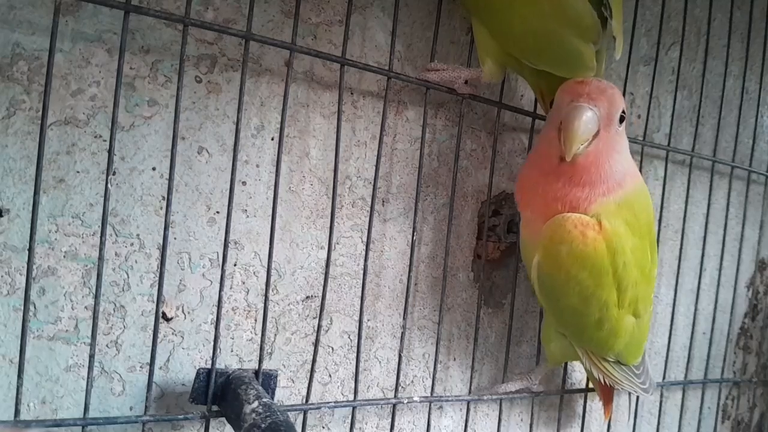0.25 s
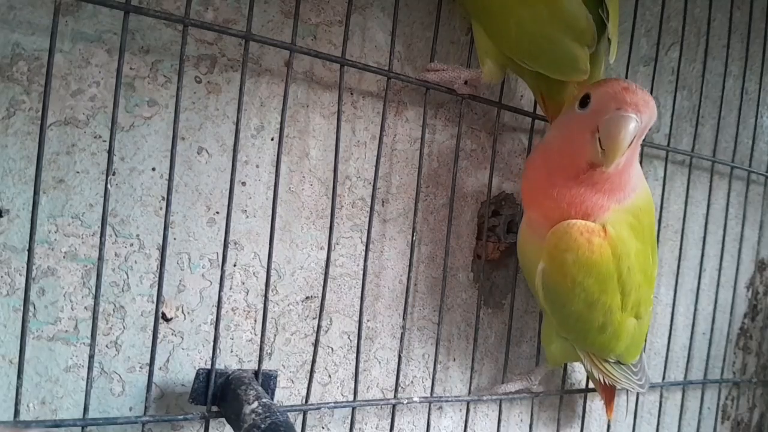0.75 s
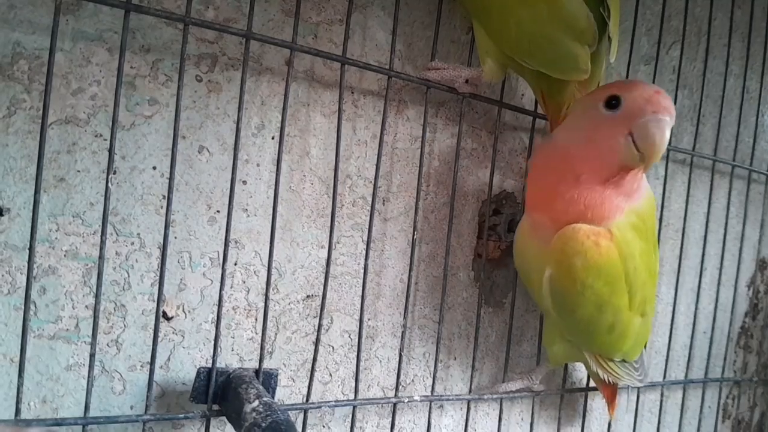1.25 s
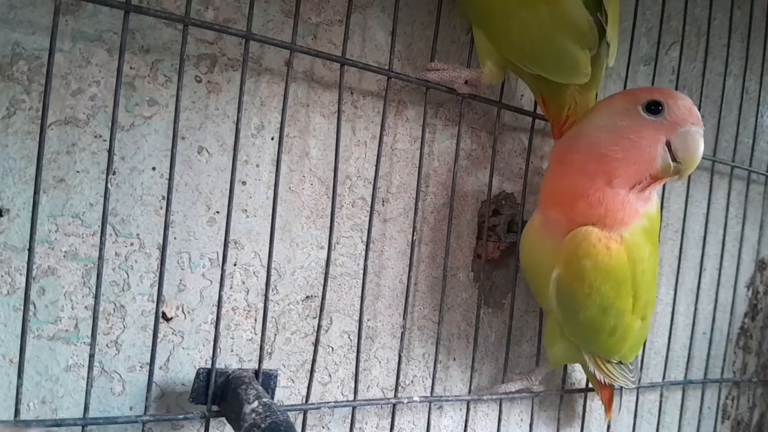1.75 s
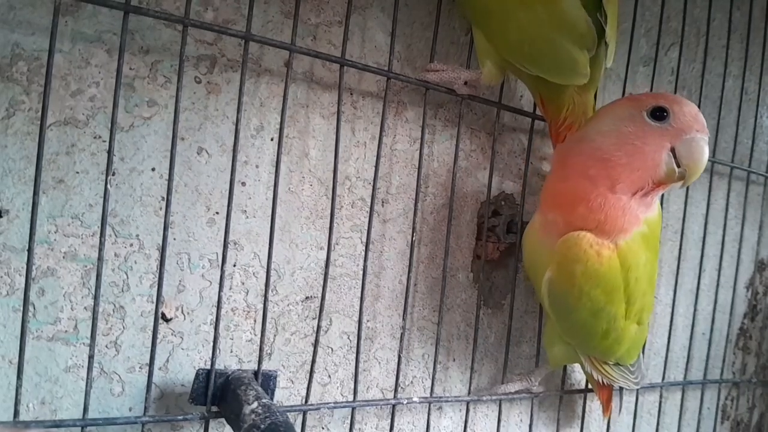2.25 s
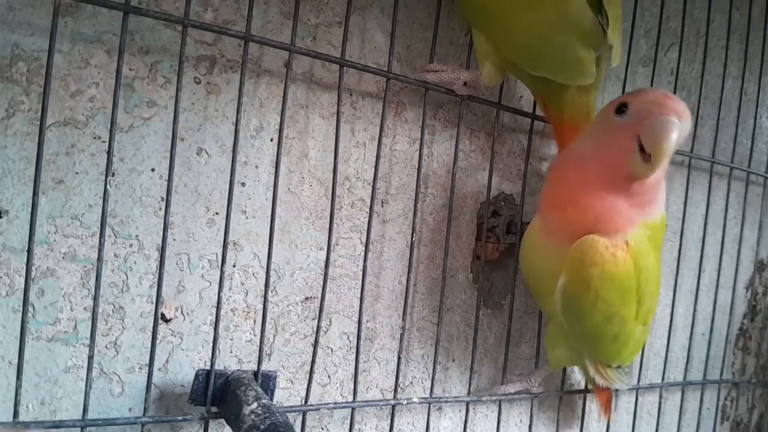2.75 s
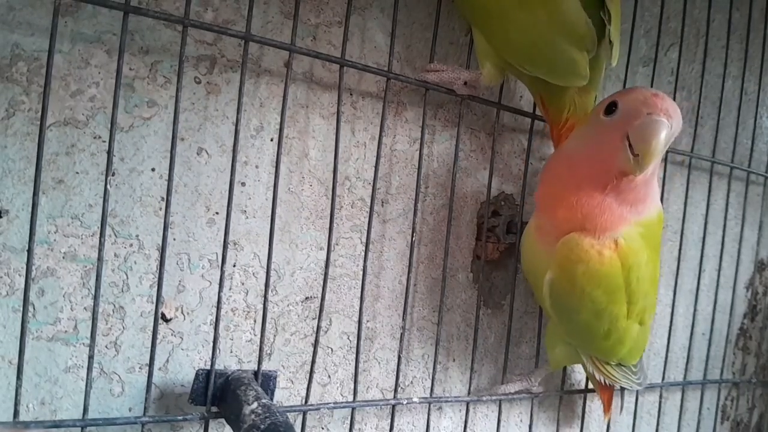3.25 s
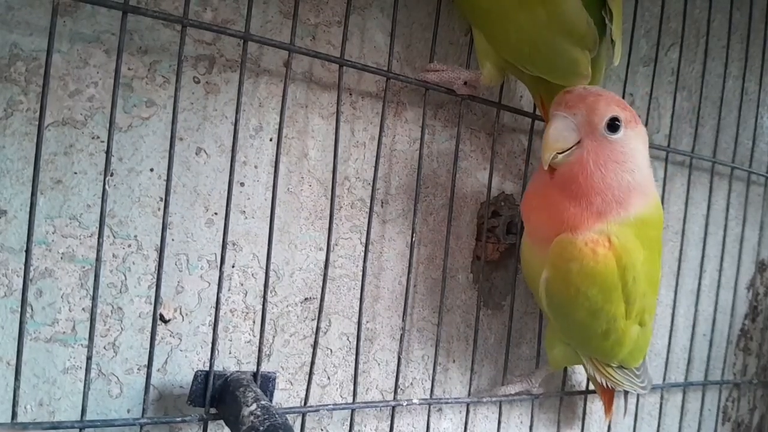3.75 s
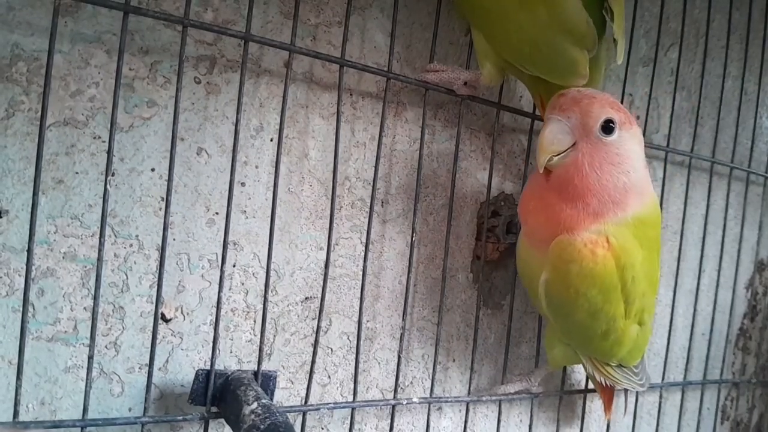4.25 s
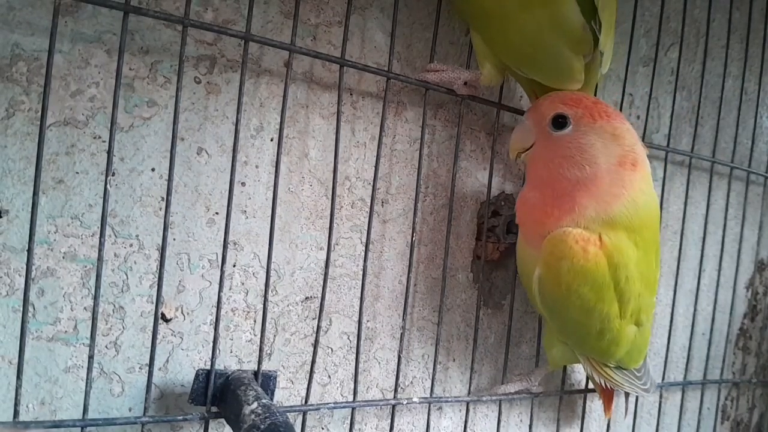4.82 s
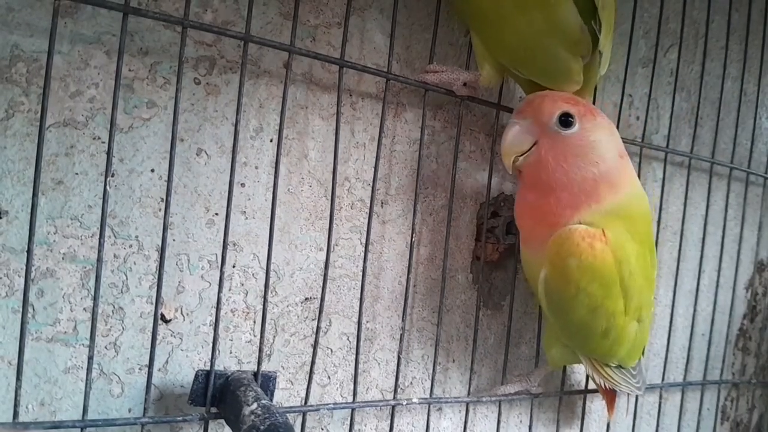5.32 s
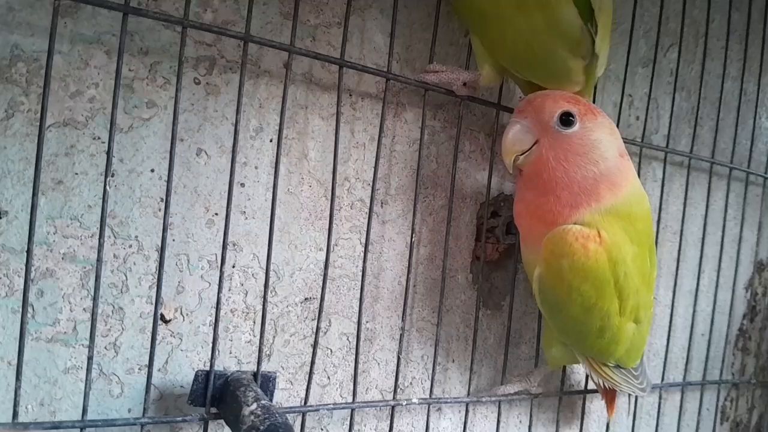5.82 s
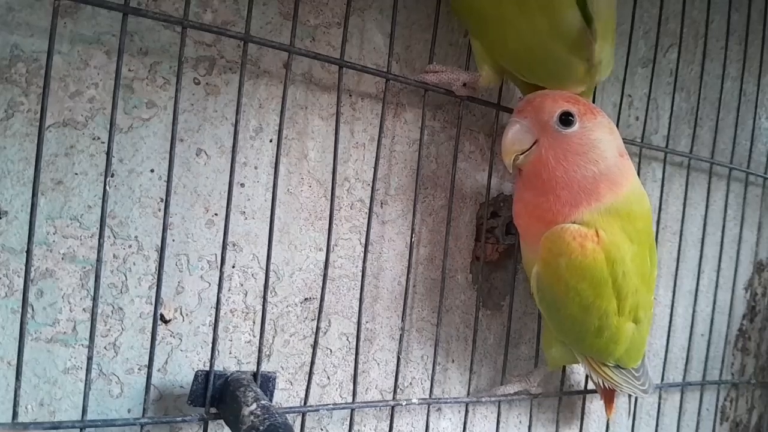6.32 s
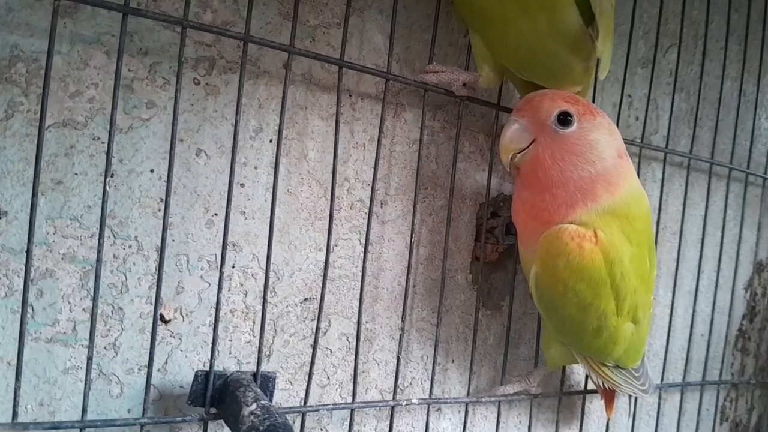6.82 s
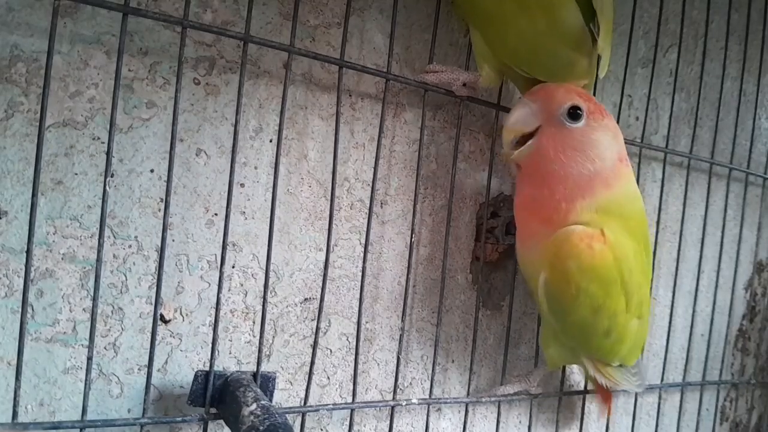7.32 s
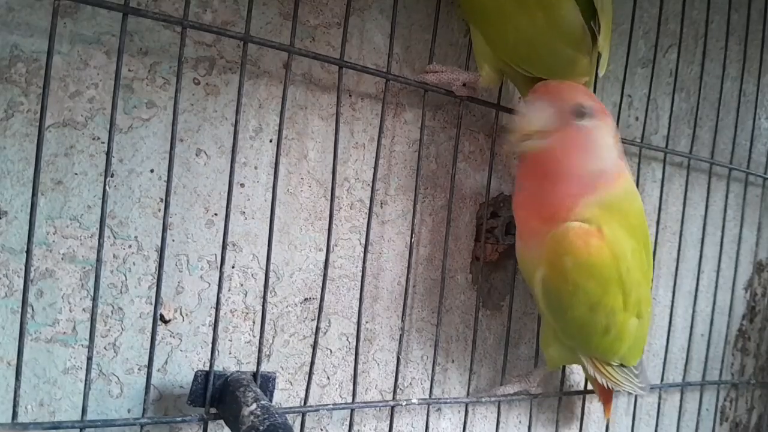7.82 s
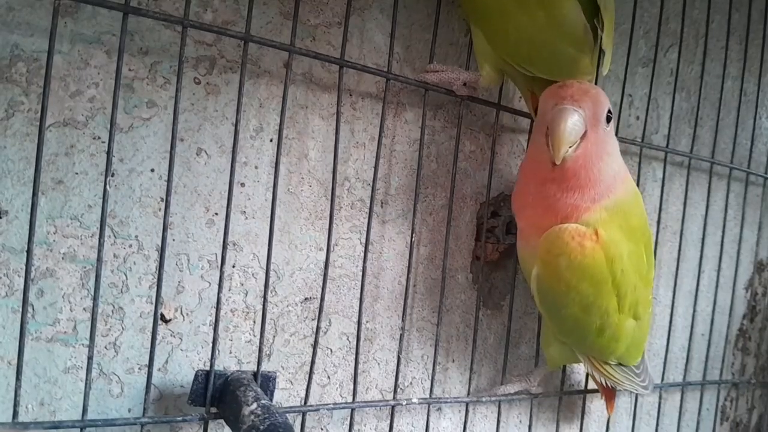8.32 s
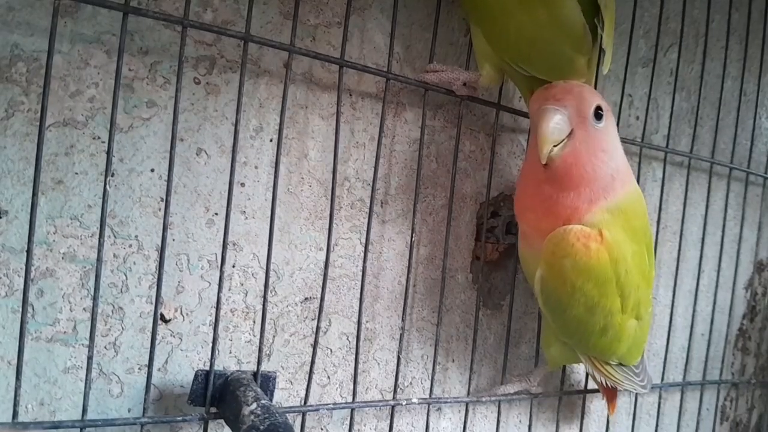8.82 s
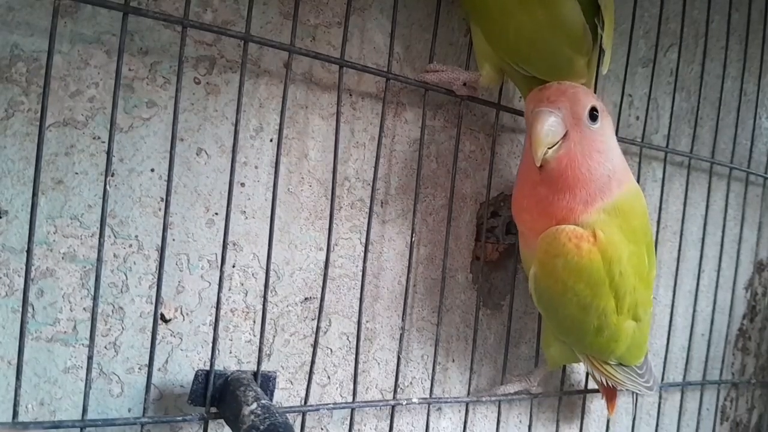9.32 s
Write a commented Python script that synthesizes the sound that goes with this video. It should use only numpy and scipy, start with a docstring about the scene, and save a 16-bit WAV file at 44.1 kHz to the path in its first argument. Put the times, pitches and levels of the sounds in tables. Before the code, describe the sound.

Piercing parrot squawks break into tiny whistles over a faint hum, followed by a pause and a fast, bright burst of chirping.

```python
"""Lovebirds in a wire cage close to the microphone, over a low wavering hum, rumble and soft hiss.
Single screeches come first: a harsh cry, mostly breaking with a crack and a puff into a shrill whistle.
Among them one far, drawn-out crow starts hoarse and sinks; the wall and the room answer faintly.
Then a fast run of chatter drifts from thin chips over falling and rasping notes to short screeches.
Voices are trembling stacks of harmonics with rasp; air, hiss and rumble are coloured noise."""
import sys
import numpy as np
from scipy import signal
from scipy.fft import rfft, irfft, next_fast_len
from scipy.io import wavfile
from scipy.ndimage import uniform_filter1d, minimum_filter1d

SR = 44100
rng = np.random.default_rng(int(sys.argv[2]) if len(sys.argv) > 2 else 0)


def file_out(sig):
    """Save sig as 16-bit WAV at sys.argv[1]."""
    # one column per channel
    cols = np.atleast_2d(sig).T
    # limit, then scale
    lim = np.clip(cols, -1, 1)
    pcm = np.round(lim * 32767).astype(np.int16)
    wavfile.write(sys.argv[1], SR, pcm)


N = 422037

# Colour of the harsh rasp in the voice. Each row: frequency in Hz, relative level in dB.
RASP_COLOUR = [(200, -3.5), (1200, -22.5), (2200, -5), (3200, 2), (5000, -2), (7000, 7), (9000, -5),
               (11000, -15), (13000, 2.5), (15000, -13.5), (16500, -17.5)]
# Colour of the breath and puffs. Each row: frequency in Hz, relative level in dB.
BREATH_COLOUR = [(20, -24), (60, 3), (160, 10.5), (400, -2.5), (700, -10), (1250, -6.5), (2000, -22.5),
                 (3200, -14), (5000, -29.5)]

SCOOP_S, SCOOP_DB = .021, 43.5  # a cry climbs to its pitch; dB quieter per share of pitch still to climb
YELP_AT_S, YELP_S = .0085, .0035  # brief upward flick near the start of a cry: time and width
WARBLE_HZ, WARBLE_DB = 117.8, 168.5  # fast wobble of a cry: rate; dB per share of pitch
CRY_AIR_DB = -15.5  # air under a cry, against the puff setting
CRY_FADE_DB = 3  # fade of a single call's cry
CRY_RIGHT_DB = 3  # added to the right side for a cry
SCREECH_CURL, SCREECH_FADE_DB, SCREECH_OVERTONES_DB = -.025, 12.5, -15.5  # whistle of a single call
WHISTLE_RASP_DB, THIRD_DB = -19, -22  # base rasp of a whistle; its colour around the third harmonic
RASP_CARRY = .4  # share of the cry's rasp level in dB that carries into the whistle
CRACK_DB = -8.5  # against the level handed to the crack
PIP_LEAD_S, PIP_DB, PIP_HZ = .017, -20, 4505  # tiny catch of the voice ahead of a chirp
PIP_LOW_HZ, PIP_LOW_DB = 1600, -8  # lower partial of a pip, against the upper one
CHATTER_WARBLE = .007  # wobble of a cry in the run, as a share of pitch
SINGLE_ROOM_DB, RUN_ROOM_DB = -28.5, -34.5  # how much the room answers
PORT_LAG = .0005  # seconds by which the right side trails
EDGE_HZ = 16100  # upper band limit


def amp(db):
    """Decibels to gain."""
    return 10 ** (np.asarray(db) / 20)


def unit(x):
    """Scales to rms 1."""
    return x / np.sqrt(np.mean(x ** 2) + 1e-20)


def read(points, hz):
    """Reads a table on a log-frequency axis."""
    f, value = np.transpose(points)
    return np.interp(np.log(hz + 1), np.log(f + 1), value)


def noise(spectrum, size):
    """White noise filtered to a colour, cut from a longer stretch of rms 1."""
    m = next_fast_len(size + 4096)
    colour = amp(read(spectrum, np.fft.rfftfreq(m, 1 / SR)))
    return unit(irfft(rfft(rng.standard_normal(m)) * colour, m))[:size]


def wander(rate_hz, size):
    """Smooth random curve, moving mostly below the given rate."""
    low_pass = [(rate_hz / 2, 0), (rate_hz, -4), (rate_hz * 4, -50), (rate_hz * 10, -100)]
    return noise(low_pass, size)


def fades(t, rise, fall):
    """Soft start and end of a note."""
    start = np.sin(np.pi / 2 * np.clip(t / rise, 0, 1)) ** 2
    end = np.sin(np.pi / 2 * np.clip((t[-1] - t) / fall, 0, 1)) ** 2
    return start * end


def add(mix, s, sound, right_db):
    """Places a sound on both sides, the right one at right_db against the left."""
    part = mix[:, round(s * SR):][:, :len(sound)]
    part += amp([[0], [right_db]]) * sound[:part.shape[1]]


def patchy(x, depth_db):
    """Narrow bands swell and fade on their own."""
    z = signal.stft(x, nperseg=1024)[2]
    field = uniform_filter1d(rng.standard_normal(z.shape[1:]), size=3, axis=0)
    field = uniform_filter1d(field, size=22, axis=1)
    return unit(signal.istft(z * amp(depth_db * unit(field)), nperseg=1024)[1][:, :N])


def background():
    """Rumble with a wavering hum, and a soft hiss; both rise and sink in level."""
    # Background level, probably as a noise suppressor turns it up and down.
    # Each row: time in seconds, rumble in relative dB, hiss in relative dB.
    background_levels = [(0, -53, -65.5), (.2, -62, -66), (.35, -50, -56.5), (1.3, -41.5, -51.5),
                         (1.75, -52, -62), (2, -47, -59), (2.3, -53.5, -59.5), (3.9, -61, -71.5),
                         (4.25, -55, -64.5), (4.549, -45, -52.5), (5.3, -48.5, -57), (6.4, -48.5, -56.5),
                         (8.5, -57.5, -73), (9.57, -61, -69.5)]
    # Colour of rumble and hiss. Each row: frequency in Hz, relative level in dB.
    floor_colour = [(15, -53.5), (25, -25.5), (59, 4.5), (108, -11.5), (157, 0), (363, -15), (714, -19.5),
                    (1190, -32.5), (4030, -40.5), (4870, -40.5), (5570, -38), (6740, -50), (7510, -43.5),
                    (11600, -58.5), (16000, -61)]
    # Hum tones. Each row: pitch in Hz, rate of wavering in Hz, level in dB before the rise and fall.
    hum_tones = [(62, 11, -66.5), (147.4, 9.8, -54.5)]
    t = np.arange(N) / SR
    s, *columns = np.transpose(background_levels)
    rumble_db, hiss_db = (np.interp(t, s, c) for c in columns)
    shared = noise(floor_colour, N)
    sides = np.array([noise(floor_colour, N), noise(floor_colour, N)])
    # the rumble is nearly alike on both sides, the hiss mostly differs
    low_pass = signal.butter(3, 420, fs=SR, output="sos")
    low = unit(signal.sosfilt(low_pass, shared + 0.075 * sides))
    high_pass = signal.butter(3, 450, "high", fs=SR, output="sos")
    high = unit(signal.sosfilt(high_pass, 0.42 * shared + sides))
    high = patchy(high, depth_db=3)
    hum = np.zeros(N)
    for hz, width, db in hum_tones:
        waver = 1 + 0.71 * wander(width, N)
        hum += amp(db) * waver * np.sin(2 * np.pi * hz * t + 2.1 * wander(width / 2, N))
    rumble = amp(rumble_db - 1.5) * low
    hum = amp(rumble_db - np.median(rumble_db)) * hum
    hiss = amp(hiss_db + 1) * high * amp([[1], [-1]])
    return rumble + hum + hiss


def syrinx(t, hz, level_db, colour, jitter, flutter, shiver_db, rasp_db):
    """A gliding, trembling stack of harmonics, with rasp that pulses with each cycle."""
    orders = np.arange(1, int(18000 / np.mean(hz)) + 1)
    hz = hz * (1 + jitter * wander(1300, len(t)) + flutter * wander(170, len(t)))
    phase = 2 * np.pi * np.cumsum(hz) / SR
    tone = np.zeros(len(t))
    for k in orders:
        tone += amp(read(colour, k * hz)) * np.cos(k * phase + rng.uniform(0, 2 * np.pi))
    rasp = amp(rasp_db) * noise(RASP_COLOUR, len(t)) * (1 + .5 * np.cos(phase))
    return amp(level_db + shiver_db * wander(190, len(t))) * unit(unit(tone) + rasp)


def cry(length, pitch, db, scoop, yelp, glide, warble, fade_db, rasp_db, low_db, treble_db, air_db):
    """The harsh opening swells as it scoops up to its pitch, then grows unstable near the break."""
    t = np.arange(0, length + .001, 1 / SR)
    u = t / t[-1]
    below = scoop * np.clip(1 - t / SCOOP_S, 0, 1) ** 1.2
    wobble = warble * np.sin(2 * np.pi * (WARBLE_HZ * t + rng.random()) + wander(55, len(t)))
    flick = yelp * np.exp(-((t - YELP_AT_S) / YELP_S) ** 2)
    hz = pitch * (1 + glide * (u - .5) - below + wobble + flick)
    colour = [(1100, low_db - 17), (1600, low_db + 7.5), (2200, low_db - 3), (3100, low_db - 0.5),
              (4100, 0.5), (5200, 6.5), (7000, -2.5), (8600, treble_db + 2), (10800, treble_db - 2.5),
              (13000, treble_db + 7.5), (15500, treble_db - 7)]
    unrest = np.exp((t - t[-1]) / 0.00076)
    jitter = .024 * amp(rasp_db) * (2500 / pitch) ** .4 + .04 * unrest
    level_db = db - SCOOP_DB * below + WARBLE_DB * wobble - fade_db * u ** 2
    voice = syrinx(t, hz, level_db, colour, jitter, flutter=.002, shiver_db=2.13,
                   rasp_db=rasp_db - 10.5 + 6.6 * unrest)
    air = amp(air_db) * noise(BREATH_COLOUR, len(t))
    return (voice + air) * fades(t, rise=0.0015, fall=0.0021)


def crack(db):
    """The voice flicks upward in a burst of rasp as it breaks."""
    t = np.arange(0, .012, 1 / SR)
    flick_hz = np.interp(t, [.001, .007], [3800, 7600])
    flick = np.sin(2 * np.pi * np.cumsum(flick_hz) / SR)
    burst = np.exp(-((t - .004) / 0.0016) ** 2)
    return amp(db + CRACK_DB) * unit(noise(RASP_COLOUR, len(t)) + 2.1 * flick) * burst


def whistle(length, pitch, db, glide, curl, fade_db, overtones_db, puff_db, rasp_db):
    """With a puff of air the voice settles on a nearly pure, beating high note that bends."""
    t = np.arange(0, length + 0.00074, 1 / SR)
    u = t / t[-1]
    hz = pitch * (1 + glide * (u - .5) + curl * (2 * u - 1) ** 2)
    colour = [(6800, 0.0018), (9000, overtones_db), (11500, overtones_db), (13500, THIRD_DB)]
    unrest = np.exp(-t / .0065)
    clearing_db = 14 * unrest - 7 - 11 * u
    voice = syrinx(t, hz, db + 1 - fade_db * u ** 1.5, colour, jitter=.003 + .059 * unrest ** 2,
                   flutter=.005, shiver_db=1.0,
                   rasp_db=WHISTLE_RASP_DB + RASP_CARRY * rasp_db + clearing_db)
    beat_hz = rng.uniform(100, 220)
    voice *= 1 + .11 * np.sin(2 * np.pi * (beat_hz * t + rng.random()))
    air = amp(puff_db + 7.5) * noise(BREATH_COLOUR, len(t)) * (np.exp(-t / 0.0037) + 0.077)
    return (voice + air) * fades(t, rise=0.00033, fall=0.0056)


def screeches():
    """Single calls with a cry and mostly a whistle; two leap to a higher cry before they break."""
    # Each row: start in seconds, cry length in seconds, whistle length in seconds (0 for none),
    # cry pitch in Hz before its bends, cry level in dB, scoop, yelp, cry glide and warble as shares
    # of pitch, whistle pitch in Hz before its bends, whistle level in dB, whistle glide as a share,
    # then rasp, low overtones, treble, puff and right side, all in relative dB.
    single_calls = [(0.227, 0.0744, 0.0362, 2178, -21.5, 0.365, 0.15, -0.069, 0.00275, 5150.5, -12, 0.058, -3.5, 1, -2, -44.5, -9),
                    (1.412, .046, 0, 2425, -4, 0.216, 0.66, 0.0203, .004, 0, 0, 0, -16, -11.5, -11, -21.5, -19.5),
                    (1.455, .046, 0.0373, 2665, -3.5, 0.101, 0.07, -0.00045, 0.00098, 5332.5, -4, 0.0089, -21, -6.5, -21.5, -28.5, -14.5),
                    (1.555, .074, 0.0295, 1894, -10.5, 0.051, 0.46, 0.03, .002, 5368, -5, 0.0286, -14, -8, -8.5, -24, -20),
                    (2.653, 0.067, 0.0228, 2585, -12, 0.274, 0.13, 0.02, .005, 5723.5, -9.5, 0.07, -12, -5.5, -14, -47, -15.5),
                    (2.789, 0.02, 0, 2202, -8.5, 0, 0.08, 0.0082, 0.057, 0, 0, 0, 7.5, -8.5, -4, -13.5, -20.5),
                    (2.801, .049, 0.0295, 2565, -7.5, 0.00054, 0.07, 0.032, 0.0045, 5899, -9.5, 0.27, -9.5, -15.5, -14.5, -21.5, -18),
                    (2.894, .011, .026, 4553, -4.5, 0.06, 0.14, -0.026, .004, 5149.5, -5.5, -.01, -8.5, -14, -12, -19, -24),
                    (2.962, 0.0685, .022, 1158, -14.5, .16, 0.18, .07, .008, 5348.5, -7.5, -0.015, -1.5, -10, -5, -25, -25),
                    (4.36, 0.06596, 0.02714, 2476, -12, 0.44, 0, 0.0393, 0.0225, 5453.5, -8.5, .14, -8.5, -5, -8.5, -43.5, -15.5),
                    (4.651, .057, 0.0251, 2520, -6.5, 0.383, 0.2, 0.0177, 0.0132, 5253.5, -5, 0.042, -8, -4.5, -13, -34, -16)]
    out = np.zeros((2, N))
    for (start, cry_s, whistle_s, cry_hz, cry_db, scoop, yelp, cry_glide, warble,
         whistle_hz, whistle_db, glide, rasp_db, low_db, treble_db, puff_db, right_db) in single_calls:
        opening = cry(cry_s, cry_hz, cry_db, scoop, yelp, cry_glide, warble, CRY_FADE_DB,
                      rasp_db, low_db, treble_db, puff_db + CRY_AIR_DB)
        add(out, start, opening, right_db + CRY_RIGHT_DB)
        if whistle_s > 0:
            ending = whistle(whistle_s, whistle_hz, whistle_db, glide, SCREECH_CURL, SCREECH_FADE_DB,
                             SCREECH_OVERTONES_DB, puff_db, rasp_db)
            add(out, start + cry_s - .004, crack(whistle_db + 3), right_db)
            add(out, start + cry_s, ending, right_db)
    return out


def wall(x):
    """Near echoes; the right port faces away and hears more of them, and the scatter of the cage."""
    # Echoes off the wall. Each row: delay in seconds, left level in dB, right level in dB.
    echoes = [(.0011, -39, -16), (.0029, -20.5, -18.5), (.0063, -27, -12)]
    # Colour of the right side. Each row: frequency in Hz, gain in dB.
    right_colour = [(200, -7), (600, -12), (1200, -5.5), (2200, 4), (4000, 8), (5200, 3.5), (8000, -1),
                    (12000, 0.5)]
    out = x.copy()
    for delay, left_db, right_db in echoes:
        out += amp([[left_db], [right_db]]) * np.roll(x, round(delay * SR), axis=1)
    t = np.arange(0, .03, 1 / SR)
    scatter = rng.standard_normal(len(t)) * np.exp(-t / .006)
    scatter /= np.linalg.norm(scatter)
    right = out[1] + amp(-13) * signal.oaconvolve(x[0], scatter)[:N]
    m = next_fast_len(N)
    right = irfft(rfft(right, m) * amp(read(right_colour, np.fft.rfftfreq(m, 1 / SR))), m)[:N]
    return np.array([out[0], np.roll(right, round(PORT_LAG * SR))])


def room(x):
    """A diffuse tail of noise, each band dying at its own speed."""
    # Colour of the tail. Each row: frequency in Hz, relative level in dB.
    tail_colour = [(700, -4.5), (2400, 3.5), (3600, -2), (5100, -6), (6500, -6), (10000, 10.5),
                   (15000, -5.5)]
    # Decay of the tail. Each row: frequency in Hz, time to fall by 60 dB in seconds.
    tail_t60 = [(200, 0.23), (2000, 0.21), (5200, 0.32), (9000, 0.12), (15000, 0.076)]
    hz, t, z = signal.stft(rng.standard_normal((2, SR)), SR, nperseg=256)
    fall_db = read(tail_colour, hz)[:, None] - 60 * t / read(tail_t60, hz)[:, None]
    tail = signal.istft(z * amp(fall_db), SR, nperseg=256)[1]
    tail *= np.clip(np.arange(tail.shape[1]) / SR / 0.01, 0, 1)  # builds up over 10 ms
    return signal.fftconvolve(x[None], tail / np.linalg.norm(tail[0]), axes=1)[:, :N]


def crow():
    """A far bird starts hoarse and holds a slowly sinking note, heard largely through the room."""
    # Course of the call. Each row: time in seconds, pitch in Hz, relative level in dB, roughness 0-1.
    course = [(1.88, 697, -69.5, 0.75), (2.1, 777.7, -73, 0.64), (2.35, 798.2, -65, 0.7),
              (2.6, 768, -67, 0.7), (3.049, 749.6, -69, 0.05), (3.4, 740.2, -76.5, 0.01),
              (3.7, 724.8, -71, 0.11), (3.95, 699.7, -87, 0.33)]
    # Harmonics of the voice. Each row: multiple of the pitch, relative level in dB when rough.
    harmonics = [(1, 12.5), (2, -5), (3, -12.5), (4, -24)]
    s, *columns = np.transpose(course)
    t = np.arange(s[0], s[-1], 1 / SR)
    hz, db, rough = (np.interp(t, s, c) for c in columns)
    phase = 2 * np.pi * np.cumsum(hz * (1 + .05 * rough * wander(120, len(t)))) / SR
    voice = np.zeros(len(t))
    for k, harmonic_db in harmonics:
        # as the voice clears, the odd harmonics fall away
        clearing_db = (k % 2) * 31 * (rough - 0.99)
        voice += amp(harmonic_db + clearing_db) * np.sin(k * phase)
    out = np.zeros((2, N))
    add(out, s[0], amp(db) * unit(voice), right_db=0.5)
    return amp(-2.5) * out + amp(6.5) * room(out[0])


def pip():
    """A few milliseconds of rasp around two thin tones."""
    t = np.arange(0, .012, 1 / SR)
    phase = 2 * np.pi * np.cumsum(1 + .046 * wander(1100, len(t))) / SR
    tone = np.sin(PIP_HZ * phase) + amp(PIP_LOW_DB) * np.sin(PIP_LOW_HZ * phase)
    envelope = t / 0.001546 * np.exp(1 - t / 0.001456)
    return amp(PIP_DB) * envelope * (2.7 * tone + 2.1 * noise(RASP_COLOUR, len(t)))


def chatter():
    """About ten calls a second, each a short cry, a crack and a whistle, many with a faint pip ahead."""
    # The fast run. Each row: start in seconds, cry length in seconds, whistle length in seconds,
    # cry pitch in Hz before its bends, cry level in dB, whistle pitch in Hz before its bends,
    # whistle level in dB, whistle glide and curl as shares of pitch, pip strength 0-1 before cubing.
    calls = [(5.841, 0.00904, 0.0305, 3923, -14, 4666, -0.5, 0.017, 0.0624, 0.06),
             (5.925, 0.00883, 0.025, 4501, -8.5, 4724, 0.5, 0.0053, 0.0442, 0.44),
             (6.028, 0.0084, 0.033, 4332, -7.5, 4651, -2.5, -0.043, 0.0258, 0.47),
             (6.141, 0.01027, 0.03, 4264, -12, 4666, -3, 0.022, 0.0733, 0.45),
             (6.259, 0.01098, 0.0318, 4536, -7, 4655, -5, -0.03, 0.024, 0.39),
             (6.378, 0.01135, 0.0272, 4214, -16, 4799, -2.5, -0.0625, -0.0352, 0.43),
             (6.516, 0.01022, 0.0305, 4380, -17.5, 4713, -5.5, -0.061, 0.0194, 0.54),
             (6.636, 0.00918, 0.0415, 4355, -13.5, 4645, -12, 0.066, -0.00083, 0.51),
             (6.749, 0.00952, 0.0421, 4417, -15, 4702, -7.5, -0.0664, 0.031, 0.48),
             (6.867, 0.01325, 0.0312, 4230, -16, 4722, -1, -0.0805, -0.0033, 0.49),
             (6.987, .016, 0.0184, 4065, -14.5, 5302, 0.5, -0.0435, -0.0406, .6),
             (7.081, 0.01272, 0.0118, 3398, -5, 5396, 2.5, -0.043, 0.027, 0.06),
             (7.176, 0.011, 0.0295, 3365, -4, 5328, -5, 0.0061, 0.019, 0.36),
             (7.266, 0.01397, 0.024, 3042, -7, 5184, -7, 0.029, 0.0664, 0.27),
             (7.361, 0.0122, 0.0244, 3143, -4, 5160, -6.5, 0.0071, 0.0494, 0.42),
             (7.457, 0.01155, 0.024, 3279, -5, 5123, -8.5, -0.0384, 0.0047, 0.37),
             (7.559, 0.01072, 0.0196, 3326, -5, 5309, -7, -0.063, -0.016, 0.45),
             (7.659, 0.01352, 0.02275, 1817, -23.5, 5082, -6.5, -0.0061, 0.063, 0.41),
             (7.759, 0.014, 0.06155, 1894, -14.5, 5204, -5.5, .01, .01, 0.46),
             (7.873, 0.01007, 0.0239, 1963, -18.5, 5120, -4.5, 0.0197, 0.0218, 0),
             (7.947, 0.01438, 0.0228, 1918, -18.5, 4813, -7.5, 0.055, 0.131, 0.04),
             (8.033, 0.013, 0.0286, 4126, -14.5, 4933, -4.5, -0.012, 0.089, 0.26),
             (8.118, 0.01266, 0.0328, 1807, -24.5, 4806, -8, 0.0364, 0.087, 0),
             (8.217, .018, 0.02685, 2899, -17, 4792, -9.5, -0.06, -0.0098, 0.49),
             (8.323, 0.022, 0.04426, 2817, -13.5, 4805, -11, 0.0072, -0.0225, 0.44),
             (8.437, 0.0376, 0.03473, 2943, -14, 4814, -10.5, 0.08, 0.0375, 0),
             (8.552, 0.0378, 0.02903, 2963, -11.5, 5281, -8.5, -0.0654, 0.0106, 0),
             (8.66, 0.03726, 0.01975, 3007, -15.5, 5470, -6.5, 0.142, -0.0576, 0.3),
             (8.755, 0.0259, 0.01686, 2960, -15.5, 5572, -7.5, 0.079, -0.145, 0.34),
             (8.837, 0.03492, 0.01017, 2948, -15.5, 5539, 0.5, -0.0007, -0.024, 0.4),
             (8.938, 0.0311, 0.02233, 2906, -9, 5461, -6.5, 0.045, -0.071, 0.12),
             (9.078, 0.01317, 0.03327, 5320, -11.5, 4796, -9.5, -0.0047, 0.1335, 0.26)]
    # Drift of the voice. Each row: time in seconds, scoop and cry glide as shares of pitch,
    # cry fade in dB, then rasp, low overtones, treble and whistle overtones in relative dB,
    # whistle fade in dB, puff and right side in relative dB.
    manner = [(5.84, 0, 0.212, 9.5, -3.5, -17, -13, -18, 17.5, -24.5, -13.5),
              (6.38, 0, -0.022, 6, -4, -18.5, -10.5, -13, 15.5, -37, -14.5),
              (6.98, 0, -0.079, -9.5, -1.5, -20.5, -12, -13.5, 29.5, -32, -23),
              (7.08, 0, -0.4406, 9, -4, -24.5, -8.5, -14, 18, -26.5, -53),
              (7.56, 0, -0.265, 21, 3, -40.5, -17, -25, -3, -17, -39),
              (7.66, 0, 0.128, -8.5, 14.5, -69.5, -6, -22.5, 4, -19, -22),
              (8.12, 0, 0.071, 8.5, -10, -6, -1, -21, 7.5, -18.5, -28),
              (8.319, 0, -0.031, 1, -7.5, -14.5, -8, -22.5, -2, -13.5, -19.5),
              (8.438, .24, 0.02, 0.5, -7.5, -11, -8, -23, 2.5, -15, -27.5),
              (8.75, 0.23, .17, -2.5, 1.5, -12, -5, -23, 2, -16, -44.5),
              (8.94, 0.3, .18, 6.5, 0.5, -13.5, -10, -19, 8.5, -20.5, -24),
              (9.078, 0, -0.0872, 0, -0.5, -12, -3, -12.5, 7.5, -24.5, -19)]
    # Brief lower notes around a chirp. Each row: start in seconds, length in seconds,
    # pitch in Hz, level in dB.
    grace_notes = [(6.981, .007, 4162, -8.5), (7.016, 0.01194, 4514, -9.5), (7.105, 0.01523, 4521, -13)]
    out = np.zeros((2, N))
    times, *controls = np.transpose(manner)
    for (start, cry_s, whistle_s, cry_hz, cry_db,
         whistle_hz, whistle_db, glide, curl, pip_strength) in calls:
        (scoop, cry_glide, cry_fade_db, rasp_db, low_db, treble_db,
         overtones_db, fade_db, puff_db, right_db) = (np.interp(start, times, c) for c in controls)
        # a falling cry spills more air
        air_db = puff_db + CRY_AIR_DB - 5 + 55 * max(-cry_glide, 0)
        opening = cry(cry_s, cry_hz, cry_db, scoop, 0, cry_glide, CHATTER_WARBLE, cry_fade_db,
                      rasp_db, low_db, treble_db, air_db)
        ending = whistle(whistle_s, whistle_hz, whistle_db, glide, curl, fade_db,
                         overtones_db, puff_db, rasp_db)
        add(out, start - PIP_LEAD_S, pip_strength ** 3 * pip(), right_db=-10)
        add(out, start, opening, right_db + CRY_RIGHT_DB)
        add(out, start + cry_s - .004, crack(whistle_db), right_db)
        add(out, start + cry_s, ending, right_db)
    for start, length, hz, db in grace_notes:
        note = whistle(length, hz, db, glide=0, curl=0, fade_db=9.5, overtones_db=-9,
                       puff_db=-32, rasp_db=-2.5)
        add(out, start, note, right_db=-13.5)
    return out


def scene():
    """The close birds with their echoes, the far crow and the background."""
    single, run = screeches(), chatter()
    tail = room(amp(SINGLE_ROOM_DB) * single[0] + amp(RUN_ROOM_DB) * run[0])
    birds = wall(single + run) * amp([[0], [-1]])
    return birds + tail + crow() + background()


def record(dry):
    """A fast limiter holds the peaks at full scale; then the low cut and the band limit."""
    gain = 1 / np.maximum(abs(dry).max(0), 1)
    held = dry * uniform_filter1d(minimum_filter1d(gain, size=61), size=61)
    held = signal.sosfilt(signal.butter(2, 36, "high", fs=SR, output="sos"), held)
    band_limit = signal.firwin(255, EDGE_HZ, window=("kaiser", 8), fs=SR)
    return signal.oaconvolve(held, band_limit[None], "same")


dry = scene()
out = record(dry)
file_out(out)
```